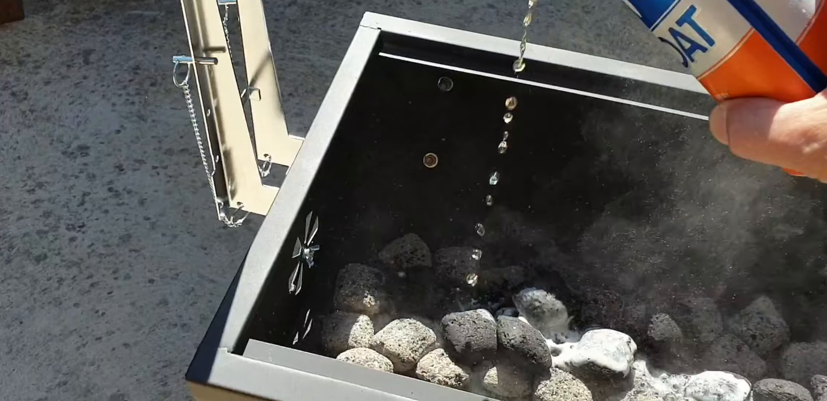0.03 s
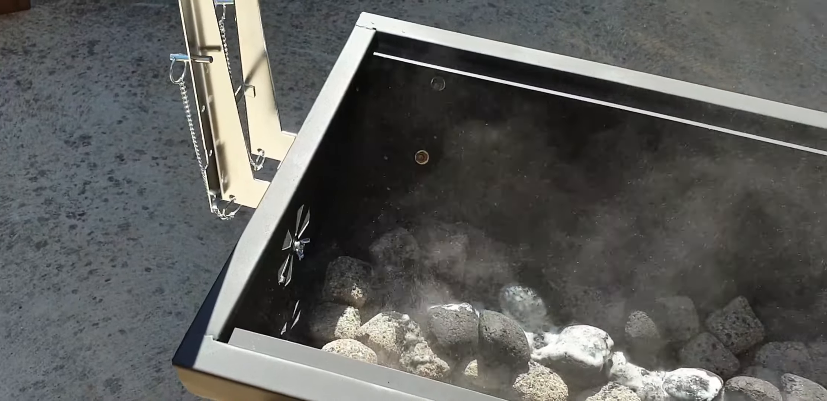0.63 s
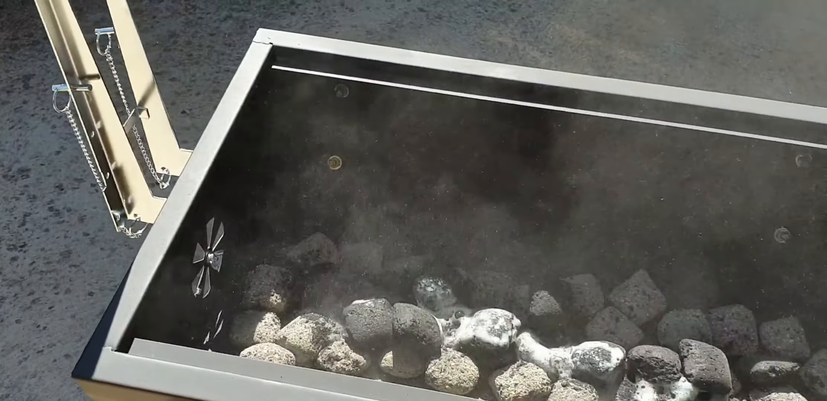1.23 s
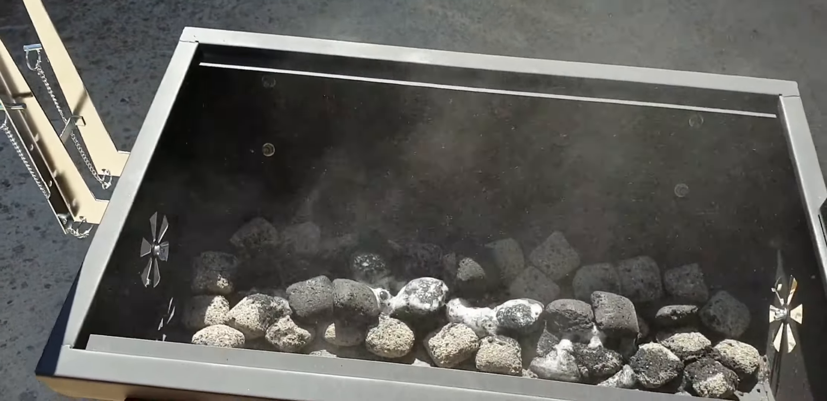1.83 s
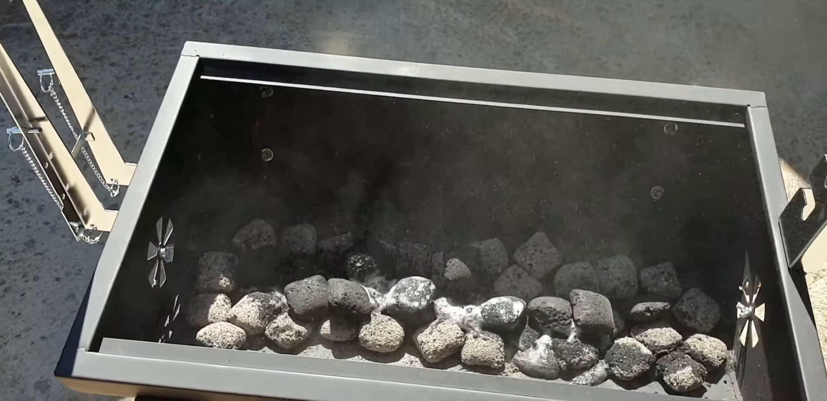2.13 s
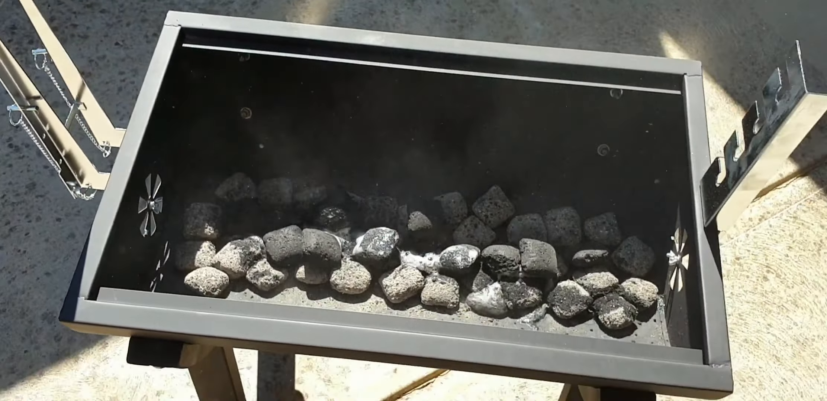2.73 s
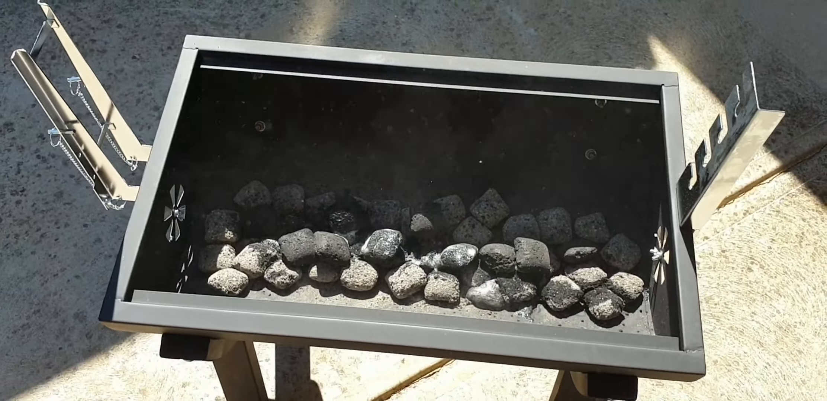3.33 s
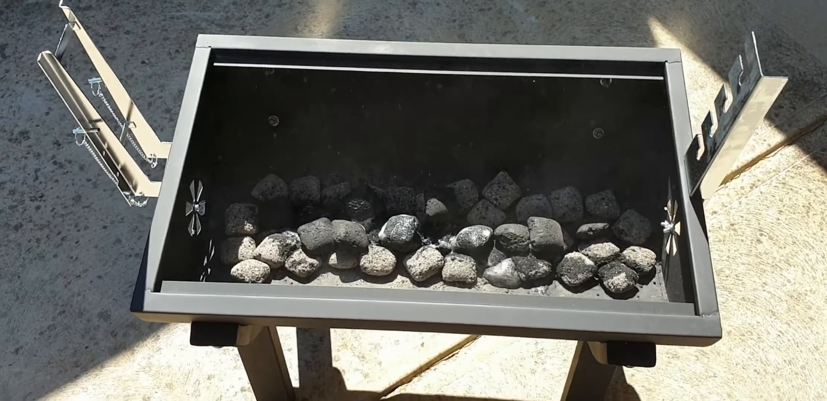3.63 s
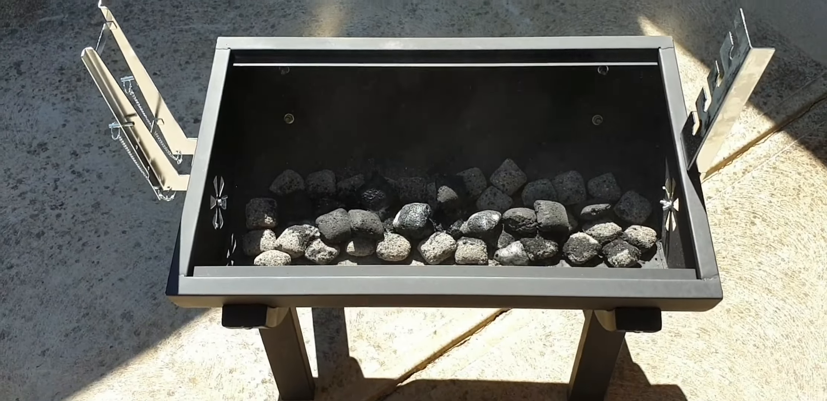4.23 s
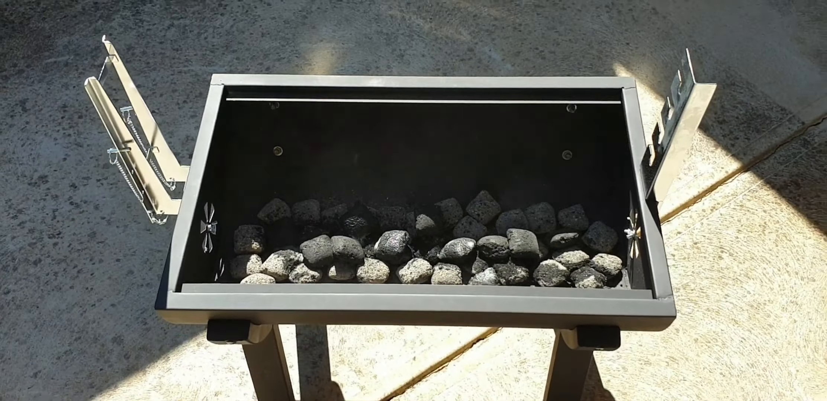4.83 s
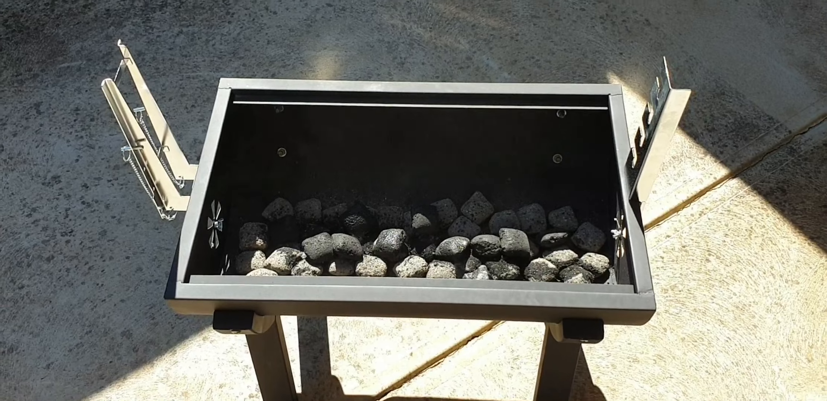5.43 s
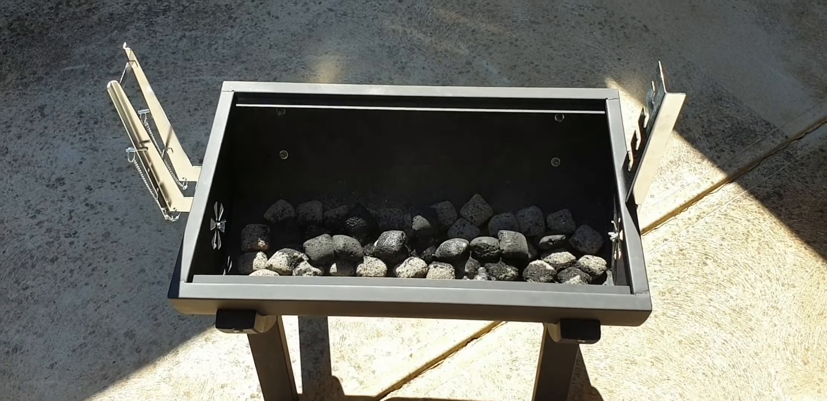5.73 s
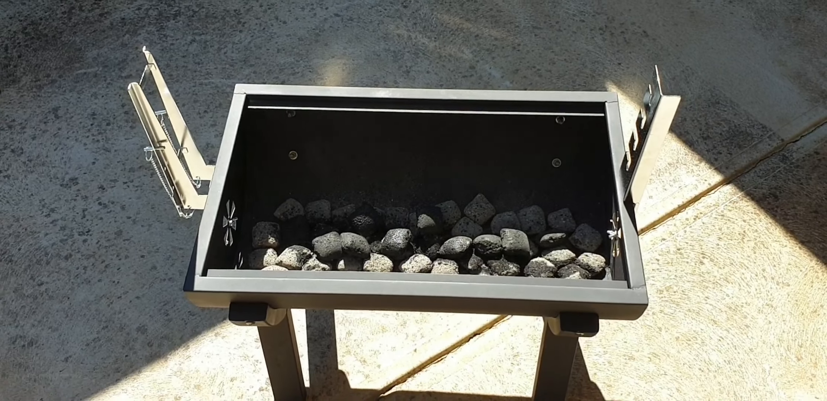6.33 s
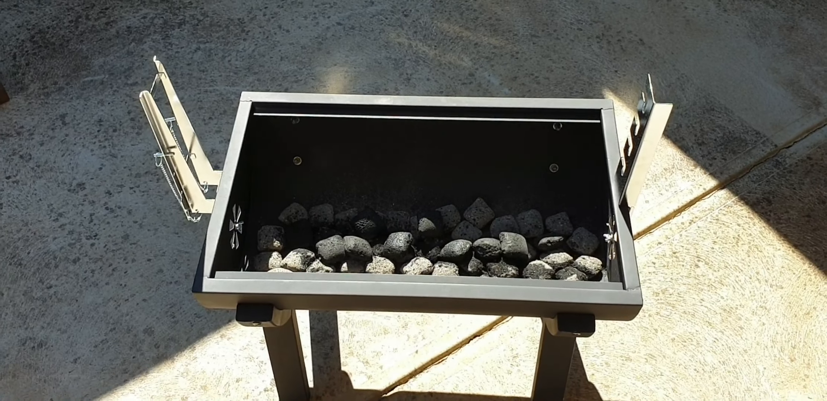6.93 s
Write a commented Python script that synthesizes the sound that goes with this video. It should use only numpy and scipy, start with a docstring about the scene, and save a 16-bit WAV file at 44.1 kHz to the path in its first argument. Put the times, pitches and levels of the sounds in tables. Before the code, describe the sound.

Liquid dribbles onto hot coals in an open steel grill, close by, and flashes into a steamy hiss with a few soft low puffs and a tiny spit. The hiss slowly dulls while a fine, high fizz rises, then both fade as the microphone backs away. Outdoors, distant traffic hums and a light breeze brushes the microphone. In the second half a small bird chirps faintly on the right.

```python
"""Liquid dribbles on hot coals in an open steel grill, outdoors, and flashes to steam: a hiss that rings
in the firebox, with low puffs and a fine fizz. A town rumbles far off, a breeze brushes the microphone,
a droplet spits. From 1.5 s the liquid thins to a film and the fizz grows; the fading steam then dulls.
From 3.3 s the coals dry as the listener steps back, and far vehicles swell. From 4.2 s a small bird
chirps on the right; one more droplet spits."""
import sys
import numpy as np
from scipy import signal
from scipy.fft import rfft, irfft
from scipy.io import wavfile
from scipy.ndimage import uniform_filter1d

SR = 44100
rng = np.random.default_rng(int(sys.argv[2]) if len(sys.argv) > 2 else 0)


def master_out(mix):
    """Clip the mix to full scale and print it as 16-bit PCM to the path in sys.argv[1]."""
    frames = np.transpose(np.atleast_2d(mix))
    ceiling = np.clip(frames, -1, 1)
    pcm = np.round(ceiling * 32767).astype(np.int16)
    wavfile.write(sys.argv[1], SR, pcm)


N = 308259

# listener circling the grill: time_s, distance_m, firebox_ring_db, left_lead_s, pan_db
LISTENER_PATH = [(0, 0.64, 3, -.00008, 3), (1.3, 0.66, 5, -.00006, 4), (2.3, 0.68, 2, .00001, 4),
                 (3.2, 0.75, 2, .00007, 4.6), (4.6, 0.93, 4, .0001, 5.5), (5.5, 1.12, -4, .00005, 5),
                 (7, 1.29, -24, .00003, 9)]
# squirts landing on the coals: time_s, puff_db, treble_lift_db
LANDINGS = [(0.06, -48.5, 4), (0.38, -49, -1.2), (0.555, -43, 2.5)]


def gain_of(db):
    """Decibels to amplitude."""
    return 10 ** (np.asarray(db) / 20)


def unit_rms(x):
    """Scales to rms 1."""
    return x / np.sqrt(np.mean(x ** 2) + 1e-20)


def at_hz(points, hz):
    """A spectrum's value at hz, on a log axis."""
    points_hz, value = np.transpose(points)
    return np.interp(np.log(hz + 1), np.log(points_hz + 1), value)


def listener(t):
    """Distance_m, firebox_ring_db, left_lead_s and pan_db at times t."""
    time_s, *columns = np.transpose(LISTENER_PATH)
    return [np.interp(t, time_s, column) for column in columns]


def panned(db):
    """Constant-power stereo gains; positive db is left."""
    pair = np.array([gain_of(db / 2), gain_of(-db / 2)])
    return pair / np.sqrt(np.mean(pair ** 2, 0))


def add(mix, start_s, sound):
    """Mixes a sound in at start_s."""
    part = mix[max(round(start_s * SR), 0):][:len(sound)]
    part += sound[:len(part)]


def ramp(t, start_s, length_s):
    """Linear rise from 0 to 1."""
    return np.clip((t - start_s) / length_s, 0, 1)


def surge(t, peak_s, rise_s, fall_s):
    """Gaussian rise to 1, exponential fall."""
    return np.exp(-(np.minimum(t - peak_s, 0) / rise_s) ** 2 - np.maximum(t - peak_s, 0) / fall_s)


def swells(rows):
    """Gain curve with one bell per row."""
    now = np.arange(N) / SR
    return sum(gain_of(db) * np.exp(-((now - peak_s) / half_s) ** 2) for peak_s, half_s, db in rows)


def grid(size):
    """Frame times (a column) and bin frequencies of short-time spectra."""
    return np.arange(N // (size // 4) + 5)[:, None] * (size // 4) / SR, np.fft.rfftfreq(size, 1 / SR)


def noise(field_db, coherence, left_lead_rad=0):
    """Stereo noise of rms 1, shaped by a time-frequency field."""
    frames, bins = field_db.shape[-2:]
    size = 2 * (bins - 1)
    coherence = np.clip(coherence, -1, 1)
    a, b, c, d = rng.standard_normal((4, frames, bins))
    left = a + 1j * b
    right = coherence * left * np.exp(-1j * left_lead_rad) + np.sqrt(1 - coherence ** 2) * (c + 1j * d)
    spectra = np.array([left, right]) * gain_of(field_db)
    _, sound = signal.istft(spectra.swapaxes(1, 2), nperseg=size, noverlap=size - size // 4)
    return unit_rms(sound[:, :N])


def patches(t, hz, frames, bins):
    """Smooth random time-frequency field of rms 1."""
    field = rng.standard_normal((len(t), len(hz)))
    return unit_rms(uniform_filter1d(uniform_filter1d(field, frames, 0), bins, 1))


def bursts(colour, per_s, spread_db):
    """Tiny bubbles burst: sparse, uneven clicks, each nearer one ear."""
    chance, size, side = rng.random(N), rng.exponential(1, N), rng.standard_normal(N)
    clicks = (chance < per_s / SR) * gain_of(spread_db * np.minimum(size, 4)) * rng.choice([-1, 1], N)
    shape = gain_of(at_hz(colour, np.fft.rfftfreq(N, 1 / SR)))
    return unit_rms(irfft(rfft(clicks * panned(9 * side)) * shape, N))


def steam(level_db=-36.5, pour_s=0.5, fade_db_per_s=2.5, dull_db=-12.5, wall_echo=0.062, echo_path_m=1.5):
    """Countless bursting bubbles hiss and ring the firebox; the hiss dulls as the spray ends."""
    # hiss spectrum: freq_hz, level_db
    colour = [(120, -11.5), (250, -7), (420, -8), (750, -1), (1150, -1), (1800, 4), (2600, 2), (3500, 1),
              (4500, 1.15), (5600, -1.5), (7500, -3), (10500, -3), (14500, -2)]
    # firebox air resonances: freq_hz, width_hz, level_db, coherence
    modes = [(304, 78, -3, 0.85), (795, 135, -5.5, 1), (1524, 210, 2.5, 0.7), (2280, 160, -3, 0.81),
             (3370, 180, -8, .1)]
    # likeness of the hiss at both ears: freq_hz, coherence
    hiss_coherence = [(100, 0.41), (300, 0.19), (450, 0.35), (700, 0.5), (1100, 0.25), (1800, 0.1),
                      (3500, 0.016), (14000, 0.022)]
    # hiss balance: freq_hz, pan_db
    hiss_pan = [(200, -3), (380, -1), (540, 4), (800, -4), (1100, 3), (1350, 1), (1750, 5.5), (2400, 0.5),
                (3400, 1.5), (5200, -0.5), (7500, -0.5), (14000, 1)]
    t, hz = grid(size=1024)
    distance_m, ring_db, left_lead_s, _ = listener(t)
    direct = (gain_of(at_hz(colour, hz)) * panned(at_hz(hiss_pan, hz)))[:, None] ** 2
    rings = [gain_of(db + ring_db) ** 2 / (1 + ((hz - mode_hz) / (width_hz / 2)) ** 2) ** 2
             for mode_hz, width_hz, db, _ in modes]
    power = direct + sum(rings)
    shared_rings = sum(ring * mode[3] for ring, mode in zip(rings, modes))
    shared_hiss = np.sqrt(direct.prod(0)) * at_hz(hiss_coherence, hz)
    coherence = (shared_hiss + shared_rings) / np.sqrt(power.prod(0))
    # back-wall comb, sliding as the listener moves
    delay_s = (np.hypot(distance_m, echo_path_m) - distance_m) / 343
    comb = abs(1 + wall_echo * np.exp(2j * np.pi * hz * delay_s))
    # fresh drops hiss brightest; their treble beams mostly left
    spray_db = sum(db * surge(t, s + 0.031, rise_s=0.031, fall_s=0.27) for s, _, db in LANDINGS)
    lift_db = spray_db + dull_db * ramp(t, start_s=2.13, length_s=2.2)
    treble_db = np.array([lift_db, 0.62 * lift_db]) * (hz / 13500) ** 2
    # mids thin as the bubbles shrink
    body_loss_db = 0.21 * t * np.exp(-(np.log2((hz + 1) / 1580) / 0.46) ** 2)
    field_db = 10 * np.log10(power * comb ** 2) + treble_db - body_loss_db
    field_db += 1.4 * patches(t, hz, frames=14, bins=4) + 0.4 * patches(t, hz, frames=3, bins=300)
    hiss = noise(field_db, coherence, 2 * np.pi * hz * left_lead_s)
    crackle = gain_of(-12) * bursts(colour, per_s=1500, spread_db=2.8)
    now = np.arange(N) / SR
    distance_m, _, _, pan_db = listener(now)
    boil_db = level_db - fade_db_per_s * np.maximum(now - pour_s, 0) + 0.22 * flare_db(now)
    return (hiss + crackle) * gain_of(boil_db) / distance_m * panned(pan_db)


def sputter(bubbling_db=-51, drain_db_per_s=9.5):
    """Fresh liquid boils up in low puffs, over bubbling that dies as it drains."""
    # puff spectrum: freq_hz, level_db
    colour = [(50, -18), (150, 12.5), (280, 16.5), (550, 8.5), (1100, -15), (3000, -44)]
    t, hz = grid(size=1024)
    boil = noise(at_hz(colour, hz) + 2 * patches(t, hz, frames=5, bins=10), coherence=0.7)
    now = np.arange(N) / SR
    puff_power = sum((gain_of(db) * surge(now, s, rise_s=0.043, fall_s=0.082)) ** 2
                     for s, db, _ in LANDINGS)
    return boil * np.sqrt(puff_power + gain_of(bubbling_db - drain_db_per_s * now) ** 2)


def fizz(wet_db=-57.5, film_db=-46, thin_from_s=1.51, dry_from_s=3.26, fade_db_per_s=4, pan_db=15):
    """Liquid thins to a film, seethes in the pores of the coals and dries up."""
    # fizz spectrum: freq_hz, level_db
    colour = [(3000, -37), (5500, -9), (7500, -5), (8500, -1), (9500, 1.5), (10800, 1.5), (12200, -3.5),
              (13300, -5.5), (14500, -37)]
    t, hz = grid(size=256)
    pitch_ratio = 0.77 + 0.23 * ramp(t, thin_from_s, length_s=1.44)  # bubbles shrink
    field_db = at_hz(colour, hz / pitch_ratio) + patches(t, hz, frames=30, bins=3)
    field_db += 0.76 * patches(t, hz, frames=16, bins=100)  # flutter as patches boil dry
    seethe = noise(field_db, coherence=0.045)
    prickle = gain_of(-10) * bursts(colour, per_s=2300, spread_db=3.5)
    now = np.arange(N) / SR
    level_db = wet_db + (film_db - wet_db) * ramp(now, thin_from_s, length_s=0.94)
    level_db += flare_db(now) - fade_db_per_s * np.maximum(now - dry_from_s, 0)
    distance_m = listener(now)[0]
    return (seethe + prickle) * gain_of(level_db) / distance_m * panned(pan_db)[:, None]


def traffic(drone_db=-54, pan_db=2):
    """Far traffic drones and wavers; single vehicles swell out of it."""
    # drone spectrum: freq_hz, level_db
    drone_colour = [(15, -24), (30, -9), (48, -1), (64, -0.5), (83, 0.5), (115, -1.5), (165, -10.5),
                    (290, -13), (420, -18), (580, -22.5), (780, -19.5), (1100, -41), (2000, -27),
                    (8000, -33)]
    # engine and tyre spectrum: freq_hz, level_db
    vehicle_colour = [(80, -17), (210, 2), (340, -3), (520, -9), (780, -8), (1200, -22), (3000, -45)]
    # passing vehicles: peak_s, half_length_s, level_db
    passes = [(3.5, 0.35, -60.5), (4.8, 0.28, -62.5), (6.25, 0.32, -64.5)]
    t, hz = grid(size=4096)
    coherence = at_hz([(40, 0.7), (130, 0.85), (400, 0.65), (1000, 0.0), (3000, 0.22)], hz)
    drone, engines = [noise(at_hz(colour, hz) + 2 * patches(t, hz, frames=4, bins=4), coherence)
                      for colour in (drone_colour, vehicle_colour)]
    return (drone * gain_of(drone_db) + engines * swells(passes)) * panned(pan_db)[:, None]


def microphone_hiss(level_db=-67):
    """Faint, even noise of each microphone."""
    return gain_of(level_db) * rng.standard_normal((2, N))


def breeze(pan_db=2.5):
    """Soft gusts buffet the microphone with a deep rumble."""
    # gusts: peak_s, half_length_s, level_db
    gusts = [(0.09, 0.073, -49.5), (0.5, 0.17, -53.5), (0.95, 0.14, -56), (1.756, 0.074, -52),
             (2.0, 0.081, -52), (2.4, 0.28, -58), (3.52, 0.25, -52.5), (5.28, 0.086, -52)]
    # wind spectrum: freq_hz, level_db
    colour = [(15, -20), (30, -5), (50, -0.5), (80, 1.5), (115, -3), (170, -16.5), (400, -34), (1500, -60)]
    t, hz = grid(size=4096)
    buffet = noise(at_hz(colour, hz) + 2 * patches(t, hz, frames=4, bins=4), coherence=1.0)
    return buffet * swells(gusts) * panned(pan_db)[:, None]


def spits(pan_db=5):
    """Each larger droplet bursts with one dry tick."""
    # droplets: time_s, peak_db, pitch_hz, half_length_s
    droplets = [(0.174, -33, 7000, .00012), (4.5462, -35, 11000, .00016)]
    ticks = np.zeros(N)
    t = np.arange(-64, 64) / SR
    for time_s, peak_db, pitch_hz, half_s in droplets:
        tick = np.exp(-(t / half_s) ** 2) * np.cos(2 * np.pi * pitch_hz * t)
        add(ticks, time_s + t[0], gain_of(peak_db) * tick)
    return ticks * panned(pan_db)[:, None]


def flare_db(t):
    """Level boost as patches of film flare up on hot spots."""
    # flares: peak_s, boost_db
    flares = [(2.48, 3), (3.33, 3), (3.57, 3), (4.97, 1), (5.42, 3.5), (5.72, 3), (6.1, 1.5)]
    return sum(db * surge(t, peak_s, rise_s=0.054, fall_s=0.077) for peak_s, db in flares)


def bird(buzz_hz=190, buzz_depth=0.019, waver=0.0155, pan_db=-4, echo_db=-1, t60_s=0.72):
    """Thin, buzzy notes, scattered by the yard walls."""
    # notes: start_s, length_s, start_hz, end_hz, level_db
    notes = [(4.177, 0.28, 4650, 4300, -59), (6.387, 0.085, 4780, 4980, -59.5),
             (6.505, 0.064, 4820, 4700, -60), (6.5, .06, 5980, 6060, -66), (6.56, 0.067, 4980, 5130, -60)]
    song = np.zeros(N)
    for start_s, length_s, start_hz, end_hz, level_db in notes:
        t = np.arange(int(length_s * SR)) / SR
        drift = unit_rms(uniform_filter1d(rng.standard_normal(N), size=120))[:len(t)]
        buzz = buzz_depth * np.sin(2 * np.pi * buzz_hz * t)
        pitch_hz = np.linspace(start_hz, end_hz, len(t)) * (1 + buzz + waver * drift)
        tone = np.sin(2 * np.pi * np.cumsum(pitch_hz) / SR)
        add(song, start_s, gain_of(level_db) * signal.windows.tukey(len(t), .5) * tone)
    t = np.arange(SR // 2) / SR
    yard = rng.standard_normal((2, len(t))) * gain_of(-60 * t / t60_s)
    echo = signal.fftconvolve(song[None], yard / np.linalg.norm(yard[0]), axes=1)[:, :N]
    return song * panned(pan_db)[:, None] + gain_of(echo_db) * echo


def scene():
    """The grill close by; town, breeze and bird around it."""
    return steam() + sputter() + fizz() + traffic() + microphone_hiss() + breeze() + spits() + bird()


def record(dry):
    """Each microphone's port rings in the treble; a low-pass follows."""
    # port resonances, left then right: freq_hz, width_hz, boost_db
    ports = [(8570, 990, 4), (10400, 2600, 2)]
    hz = np.fft.rfftfreq(N, 1 / SR)
    port_gain = gain_of([db * np.exp(-((hz - port_hz) / (width_hz / 2)) ** 2)
                         for port_hz, width_hz, db in ports])
    coloured = irfft(rfft(dry) * port_gain, N)
    low_pass = signal.firwin(1023, cutoff=14600, window=("kaiser", 9), fs=SR)
    return signal.oaconvolve(coloured, low_pass[None], "same", axes=1)


dry = scene()
out = record(dry)
master_out(out)
```